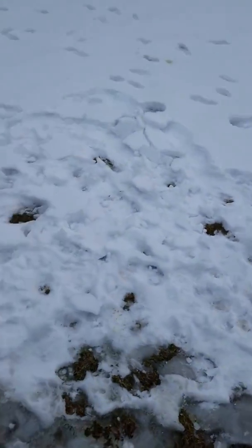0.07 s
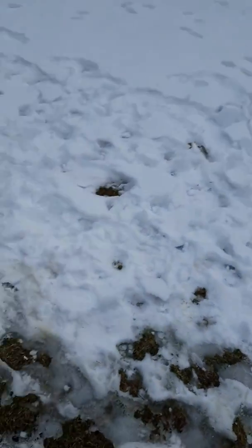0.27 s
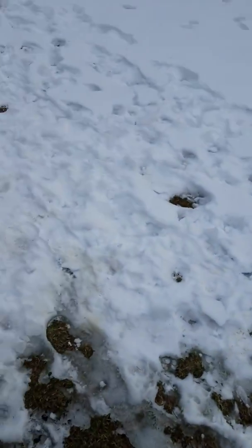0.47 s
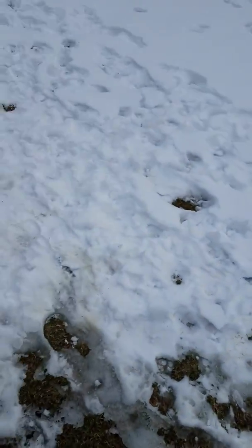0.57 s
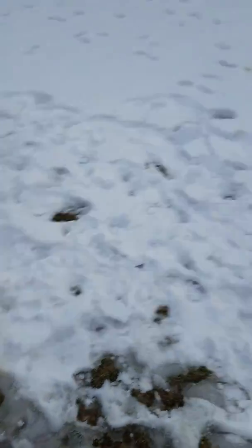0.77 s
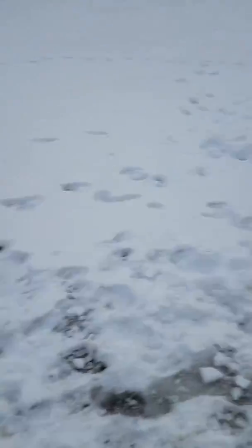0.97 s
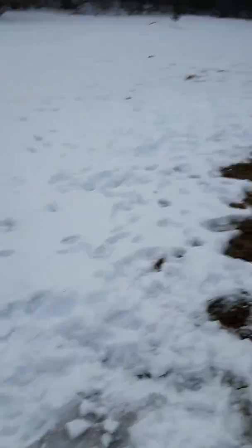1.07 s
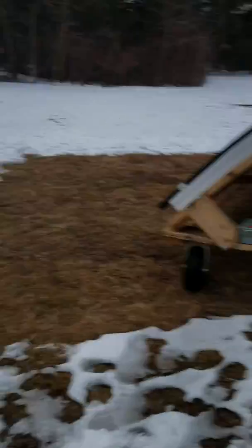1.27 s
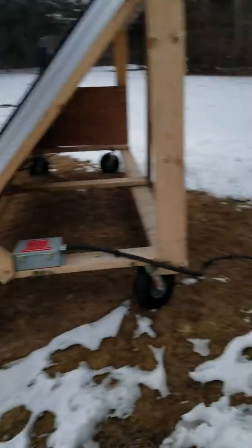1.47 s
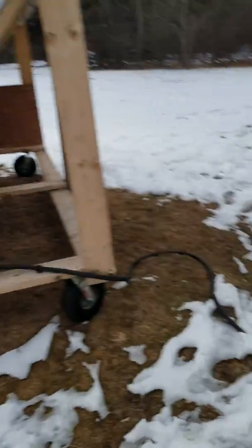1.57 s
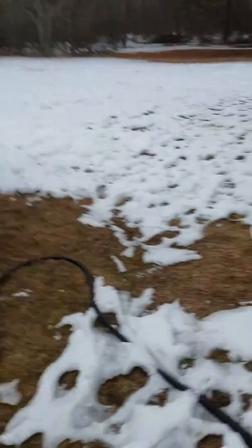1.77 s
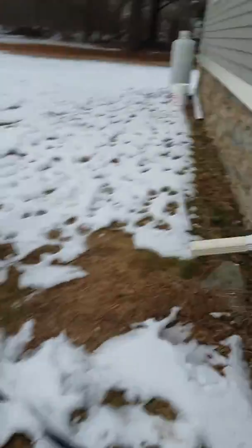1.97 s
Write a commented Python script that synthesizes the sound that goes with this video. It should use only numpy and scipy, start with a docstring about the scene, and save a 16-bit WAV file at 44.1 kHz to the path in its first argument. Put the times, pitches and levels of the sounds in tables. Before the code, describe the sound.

A walker's heavy boots break through crusty snow twice, with quiet ticks of ice in between

```python
"""An open yard under old, crusted snow: footsteps heard from a phone in the walker's hand.
Under each heavy step the crust gives way in damped, dull thumps with short noise snaps.
Clouds of random grains make the packing snow, the breaking crust and the hiss of loose crystals.
Between the two heavy steps come light shuffles, soft rubbing and single ticks of ice, made of short ringing sines.
Steady coloured noise is the quiet outdoor air."""
import sys
import numpy as np
from scipy import signal
from scipy.fft import rfft, irfft
from scipy.io import wavfile
from scipy.ndimage import uniform_filter1d

SR = 44100
rng = np.random.default_rng(int(sys.argv[2]) if len(sys.argv) > 2 else 0)


def generate_wav(sig):
    """Save sig (samples, or channels by samples) to the path in sys.argv[1] as 16-bit PCM at SR."""
    pcm = np.round(np.clip(np.atleast_2d(sig).T, -1, 1) * 32767).astype(np.int16)
    wavfile.write(sys.argv[1], SR, pcm)


N = 89655
T = np.arange(N) / SR  # time [s]

# The crust gives way under the boot:
# (time [s], body level [dB], pitch [Hz], swell [cycles], snap level [dB])
CRUST_THUMPS = [(0.0159, -36, 372, 0.51, -46.5), (0.1243, -19, 722, 0.68, -36),
                (0.1263, -15.5, 347, 0.45, -54), (0.1345, -24, 680, 1.8, -48),
                (0.1391, -29, 560, 0.86, -53), (0.148, -21, 372, 0.22, -42.5),
                (0.153, -38, 65.3, 0.99, -68), (0.1835, -22, 394, 0.51, -43.5),
                (0.5049, -33.5, 306, 0.39, -53.5), (0.5222, -29.5, 206, 0.51, -63),
                (0.5301, -45, 325, 1.3, -73), (1.0379, -36, 330, 0.55, -50.5),
                (1.7222, -27.5, 475, 1.4, -32.5), (1.7318, -10, 459, 0.74, -22.5),
                (1.7503, -31, 520, .6, -54), (1.7583, -19, 564, 0.81, -33.5),
                (1.7955, -28.5, 480, 0.53, -36.5), (1.8245, -41.5, 550, 1.1, -49),
                (1.9227, -27.5, 560, 0.56, -30.5), (2.021, -35.5, 523, 0.43, -53)]
# Snow packs and slides under the sole:
# (time [s], rise [s], decay [s], packing level [dB], crunch level [dB], hiss level [dB])
SNOW_CRUNCHES = [(0.001, 0.007, 0.012, -63, -64, -58), (0.125, 0.0081, 0.0097, -32.5, -36, -54),
                 (0.185, .003, 0.0067, -35.5, -72, -73), (0.339, 0.02, .030, -54, -55, -85),
                 (0.528, 0.016, 0.069, -54.5, -54.5, -69), (1.035, 0.03, 0.15, -59, -57, -71),
                 (1.187, 0.04, 0.0032, -54.5, -60, -61), (1.324, 0.018, 0.2, -57.5, -57.5, -65),
                 (1.7024, 0.0023, 0.09, -45, -43.5, -48.5), (1.721, 0.009, 0.032, -34.5, -30, -40),
                 (1.756, 0.0046, 0.018, -38, -41, -56), (1.800, 0.054, 0.33, -55, -50.5, -58),
                 (1.898, 0.0038, 0.025, -67, -45.5, -50), (1.922, 0.0039, 0.0065, -41, -34.5, -40.5)]
# Single ice grains snap:
# (time [s], ring level before decay [dB], pitch [Hz], ring decay [cycles], grit level [dB])
ICE_TICKS = [(0.022, -42.5, 2450, 1.5, -60), (0.1272, -42, 4750, 5.4, -41), (0.1550, -41, 2370, 1.8, -45),
             (0.2825, -46, 1880, 1.4, -67), (0.2950, -43.5, 2100, 0.86, -58), (0.3114, -45, 1870, 1.5, -59),
             (0.324, -48.5, 2000, 1.3, -67), (0.3965, -47, 2120, 4.3, -62), (0.557, -46, 3240, 3.7, -50),
             (0.5669, -45, 3100, 5.8, -57), (0.574, -50.5, 2970, 2.8, -53), (0.6006, -48, 2530, 2.2, -59),
             (0.983, -36, 1970, 0.5, -42), (1.0360, -48, 1660, 3.8, -49), (1.1110, -42, 2250, 3.6, -47),
             (1.1300, -42.5, 1950, 2.1, -47), (1.168, -37.5, 1950, 1.4, -68),
             (1.2439, -48.5, 2270, 1.3, -51.5), (1.6010, -49, 1580, 2, -48.5), (1.734, -21, 1760, 4.3, -31),
             (1.7766, -26.5, 2520, 1.3, -41), (1.8044, -30.5, 1570, 2.4, -49),
             (1.8630, -47, 3720, 2.6, -44.5), (1.905, -43, 2170, 9.1, -44),
             (1.923, -35.5, 2200, 7.4, -33.5)]
# Thin, high crackles within the hiss: (time [s], level [dB])
ICE_CRACKLES = [(0.127, -50), (1.114, -53), (1.207, -53), (1.216, -45.5), (1.336, -49), (1.602, -51),
                (1.704, -58), (1.759, -48), (1.7962, -44), (1.826, -46), (1.881, -65), (1.904, -48),
                (1.917, -60), (1.961, -45.5)]
# The swinging leg brushes past: (time [s], rise [s], decay [s], level [dB])
LEG_SWISHES = [(1.03, 0.37, 0.84, -59.5), (1.95, 0.12, .05, -63)]

# Colour of the short snap on each thump: (frequency [Hz], relative level [dB])
SNAP_COLOUR = [(300, -22), (900, 8), (1400, 3.5), (2000, -1), (3100, 1), (4000, -7.5), (5000, -11),
               (6300, -21), (15000, -23.5)]
# Colour of the dull, packing snow: (frequency [Hz], relative level [dB])
PACKING_COLOUR = [(40, -81.5), (130, -5.5), (230, -18.5), (350, 0.5), (450, -1.5), (580, -1.5),
                  (770, -19.5), (900, 5.5), (1500, -27), (4000, -68)]
# Colour of the breaking crust and stray crumbs: (frequency [Hz], relative level [dB])
CRUNCH_COLOUR = [(300, -6), (800, 14), (1200, 3.5), (1500, 0.5), (2000, 4), (2600, -6), (3400, -2.5),
                 (4700, -16), (6200, -27.5), (9000, -34), (16000, -76)]
# Colour of the fine, loose crystals: (frequency [Hz], relative level [dB])
HISS_COLOUR = [(1500, -49), (4000, -2), (5200, 1.5), (7300, -4.5), (9000, 0), (11500, 5), (15500, 4)]
# Colour of the soft rubbing: (frequency [Hz], relative level [dB])
SWISH_COLOUR = [(150, -20), (270, -24), (400, 0.5), (700, -1), (1200, -1.5), (2000, -9.5), (4000, -21.5),
                (12000, -38)]
# Colour of the outdoor air: (frequency [Hz], relative level [dB])
AIR_COLOUR = [(25, 1), (50, -3), (90, 0.5), (140, -1.5), (200, -2.5), (300, -1.5), (420, -2.5), (600, -7.5),
              (790, -5), (950, -9), (1400, -15), (2200, -19.5), (3200, -25), (5000, -29.5), (7500, -35.5),
              (10500, -32), (13000, -29), (15500, -29.5)]

THUMP_LOW_HZ = 162  # a small patch of crust radiates little bass
SNAP_RISE_S, SNAP_DECAY_S = 0.00053, 0.0018
PACKING_PER_S, CRUNCH_PER_S, HISS_PER_S = 980, 2800, 5000  # mean grains a second
GRAIN_SPREAD_DB = 1.5
FITS_PER_S, FITS_SPREAD_DB = 170, 3.5  # uneven yielding of the crust
CRACKLE_RISE_S, CRACKLE_DECAY_S = 0.00057, 0.0023
GRIT_DECAY_S = 0.00042
STRAY_PER_S, STRAY_DB = 55, -72  # stray crumbs of ice that patter all along
PORT_LAG_S, LEFT_DB, HISS_LEFT_DB = 0.00043, -2, -3  # the right port is nearer to the feet
SCATTER_DB, SCATTER_DECAY_S = -10, 0.012  # from the ground and the walker's body
DIP_HZ, DIP_Q = 900, 5.1  # the steps sound hollow just above their body
AIR_GAIN_DB, AIR_ALIKE_HZ, AIR_PAN_DB = -59, 815, -1.5  # negative pan leans right
BASS_CUT_HZ, TOP_HZ = 45, 16100


def undb(db):
    """Turn decibels into gain."""
    return 10 ** (np.asarray(db) / 20)


def unit(x):
    """Scale to rms 1."""
    return x / np.sqrt(np.mean(x ** 2))


def colour(x, points):
    """Shape a spectrum with a causal, minimum-phase filter of unit energy through the colour points."""
    size = 4096
    hz, db = np.array(points, float).T
    bins_hz = np.maximum(np.fft.rfftfreq(size, 1 / SR), 1)
    curve_db = np.interp(np.log(bins_hz), np.log(np.maximum(hz, 1)), db)
    cepstrum = irfft(np.log(undb(curve_db)))
    # folding the cepstrum puts the energy as early as possible
    cepstrum[1:size // 2] *= 2
    cepstrum[size // 2 + 1:] = 0
    response = irfft(np.exp(rfft(cepstrum)))
    return signal.fftconvolve(x, response / np.linalg.norm(response))[:N]


def swell(start, rise, decay):
    """Envelope with a straight rise and an exponential fall."""
    age = T - start
    return np.clip(age / rise, 0, 1) * np.exp(-np.maximum(age - rise, 0) / decay)


def ports(x, left_db, stray=0, share=0):
    """Two microphone ports: the left hears the feet later and weaker, with a share of sound by other paths."""
    share = np.clip(share, 0, 1)
    lag = np.round(PORT_LAG_S * SR) / SR  # whole samples
    late = np.interp(T - lag, T, x, left=0)
    left = np.sqrt(1 - share) * late + np.sqrt(share) * stray
    return np.array([undb(left_db) * left, x])


def grains(per_s, spread_db):
    """Tiny fractures at random moments, of random size and polarity, rms 1."""
    size_db = spread_db * np.clip(rng.standard_normal(N), -2, 2)
    size = undb(size_db) * rng.choice([-1, 1], N)
    return unit(size * (rng.random(N) < per_s / SR))


def granular(envelope, per_s, points, left_db, share):
    """A cloud of grains under an envelope, coloured and heard at both ports."""
    near = colour(envelope * grains(per_s, GRAIN_SPREAD_DB), points)
    stray = colour(envelope * grains(per_s, GRAIN_SPREAD_DB), points)
    return ports(near, left_db, stray, share)


def thumps():
    """Each collapse of the crust is a heavily damped swing with a short snap of noise."""
    body, snap = np.zeros((2, N))
    for start, db, hz, cycles, snap_db in CRUST_THUMPS:
        turn = np.maximum(T - start, 0) * hz  # cycles since the collapse
        age = turn / cycles
        pulse = (age * np.exp(1 - age)) ** 2  # peaks at 1
        body += undb(db) * pulse * -np.cos(2 * np.pi * turn)
        snap += undb(snap_db) * swell(start, SNAP_RISE_S, SNAP_DECAY_S)
    body = signal.sosfilt(signal.butter(2, THUMP_LOW_HZ, "high", fs=SR, output="sos"), body)
    snap_noise = colour(snap * rng.standard_normal(N), SNAP_COLOUR)
    return ports(body + snap_noise, LEFT_DB)


def fits():
    """The crust yields in fits and starts: random strengths held for a few milliseconds, rms 1."""
    index = np.cumsum(rng.random(N) < FITS_PER_S / SR)
    strength = undb(FITS_SPREAD_DB * np.clip(rng.standard_normal(N), -1.5, 1.5))
    return unit(uniform_filter1d(strength[index], size=24))  # soften the jumps


def crunching():
    """Three clouds of grains: dull packing snow, breaking crust and fine crystals."""
    packing, crunch, hiss = np.zeros((3, N))  # overlapping events add in power
    for start, rise, decay, packing_db, crunch_db, hiss_db in SNOW_CRUNCHES:
        load = swell(start, rise, decay)
        packing += (undb(packing_db) * load) ** 2
        crunch += (undb(crunch_db) * load) ** 2
        hiss += (undb(hiss_db) * load) ** 2
    for start, db in ICE_CRACKLES:
        hiss += (undb(db) * swell(start, CRACKLE_RISE_S, CRACKLE_DECAY_S)) ** 2
    uneven = fits()
    return (granular(np.sqrt(packing), PACKING_PER_S, PACKING_COLOUR, LEFT_DB, share=0.035)
            + granular(np.sqrt(crunch) * uneven, CRUNCH_PER_S, CRUNCH_COLOUR, LEFT_DB, share=1.0)
            + granular(np.sqrt(hiss) * uneven, HISS_PER_S, HISS_COLOUR, HISS_LEFT_DB, share=1.0))


def ticks():
    """Single grains snap with a pinch of grit and a very short ring; stray crumbs patter throughout."""
    ring, grit = np.zeros((2, N))
    for start, db, hz, cycles, grit_db in ICE_TICKS:
        turn = np.maximum(T - start, 0) * hz
        ring += undb(db) * np.exp(-turn / cycles) * np.sin(2 * np.pi * turn)
        grit += undb(grit_db) * swell(start, 1 / SR, GRIT_DECAY_S)
    grit_colour = [(500, -20), (2000, 4.5), (4800, -2.5), (7000, -12), (15000, -12)]
    grit_noise = colour(grit * rng.standard_normal(N), grit_colour)
    crumbs = granular(undb(STRAY_DB), STRAY_PER_S, CRUNCH_COLOUR, LEFT_DB, share=1.0)
    return ports(ring + grit_noise, LEFT_DB) + crumbs


def scatter(x):
    """A short, faint tail of decaying noise: snow returns little sound."""
    t = T[:SR // 4]
    envelope = np.exp(-t / SCATTER_DECAY_S) * (1 - np.exp(-t / 0.001))
    tails = rng.standard_normal((2, len(t))) * envelope
    tails /= np.linalg.norm(tails, axis=1, keepdims=True)
    return undb(SCATTER_DB) * signal.fftconvolve(x, tails, axes=1)[:, :N]


def swishes():
    """Soft rubbing, likely of clothes, as the leg swings: dense grains under slow swells."""
    rub = sum(undb(db) * swell(start, rise, decay) for start, rise, decay, db in LEG_SWISHES)
    return granular(rub, HISS_PER_S, SWISH_COLOUR, LEFT_DB, share=0.99)


def air():
    """Quiet, steady outdoor air: the bass is largely alike at both ports, the treble unrelated."""
    hz = np.fft.rfftfreq(N, 1 / SR)
    alike = np.clip(0.77 / (1 + (hz / AIR_ALIKE_HZ) ** 4), 0, 1)  # correlation of the ports
    mid = colour(rng.standard_normal(N), AIR_COLOUR)
    side_spectrum = rfft(rng.standard_normal(N)) * np.sqrt((1 - alike) / (1 + alike))
    side = colour(irfft(side_spectrum, N), AIR_COLOUR)
    left = (mid + side) * undb(AIR_PAN_DB / 2)
    right = (mid - side) * undb(-AIR_PAN_DB / 2)
    return undb(AIR_GAIN_DB) * np.array([left, right])


def scene():
    """Mix the hollowed steps and their scatter with the rubbing and the air."""
    steps = thumps() + crunching() + ticks()
    steps = steps + scatter(steps)
    steps = signal.lfilter(*signal.iirnotch(DIP_HZ, DIP_Q, fs=SR), steps)
    return steps + swishes() + air()


def record(dry):
    """The phone thins the deepest bass and cuts the top of the treble."""
    dry = signal.sosfilt(signal.butter(1, BASS_CUT_HZ, "high", fs=SR, output="sos"), dry)
    return signal.sosfilt(signal.ellip(10, 0.2, 70, TOP_HZ, fs=SR, output="sos"), dry)


dry = scene()
out = record(dry)
generate_wav(out)
```